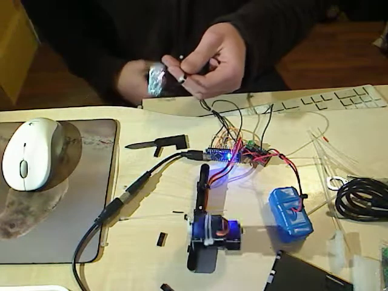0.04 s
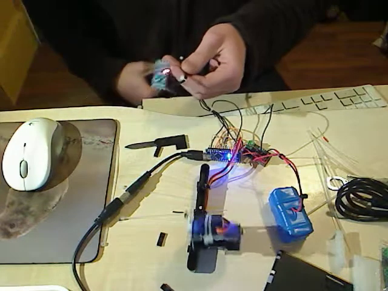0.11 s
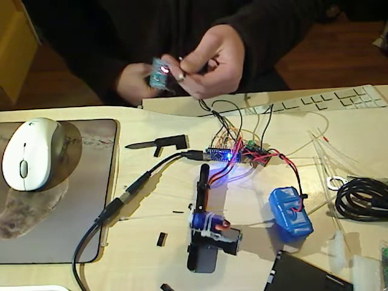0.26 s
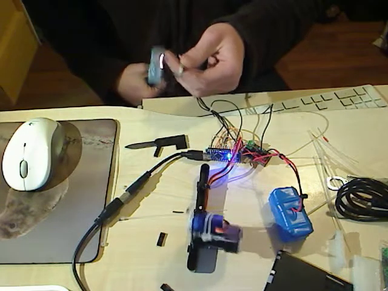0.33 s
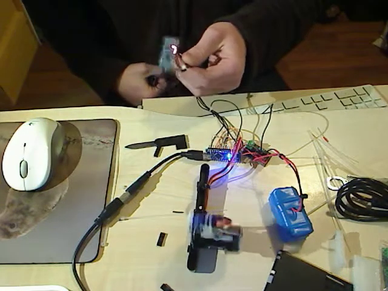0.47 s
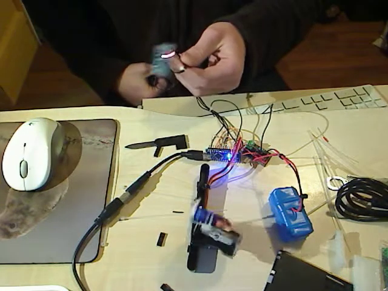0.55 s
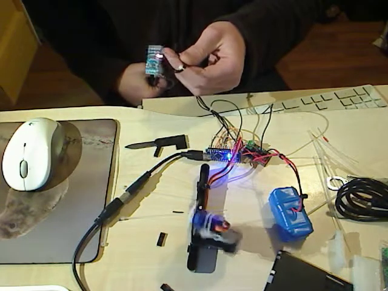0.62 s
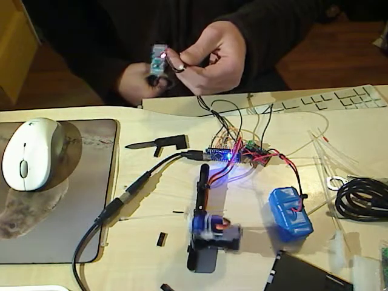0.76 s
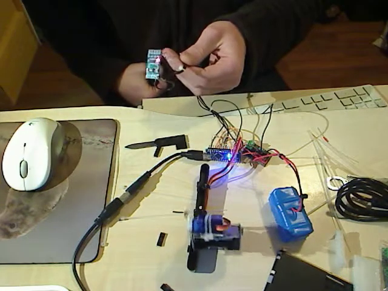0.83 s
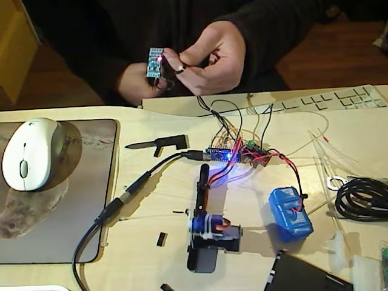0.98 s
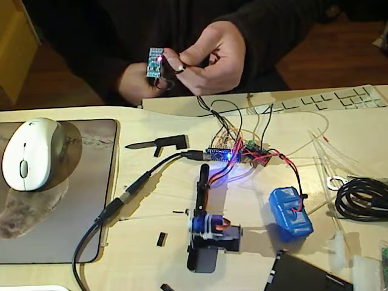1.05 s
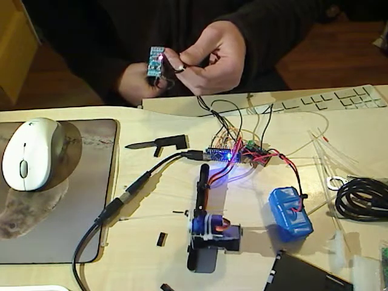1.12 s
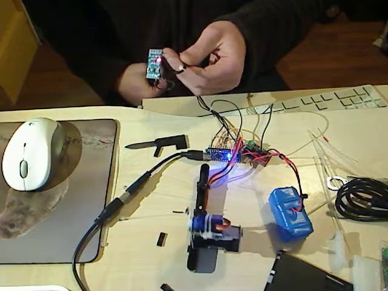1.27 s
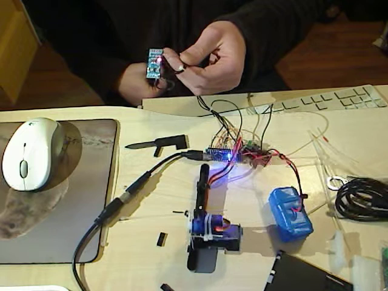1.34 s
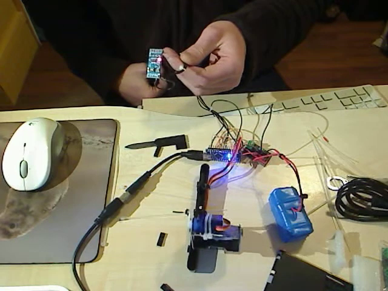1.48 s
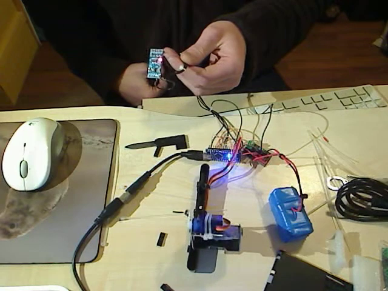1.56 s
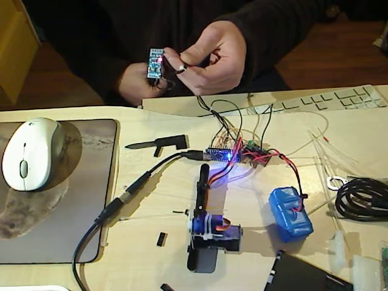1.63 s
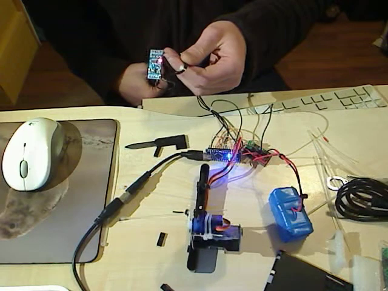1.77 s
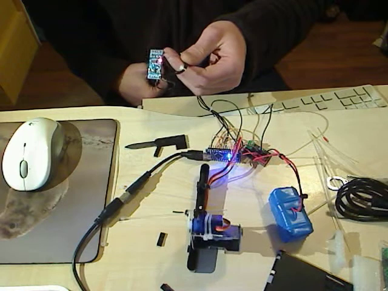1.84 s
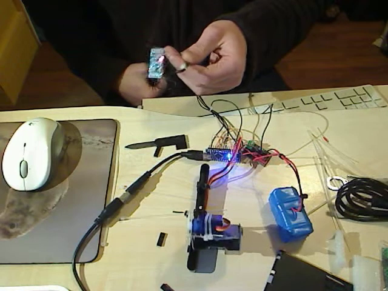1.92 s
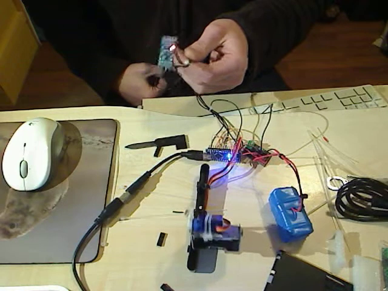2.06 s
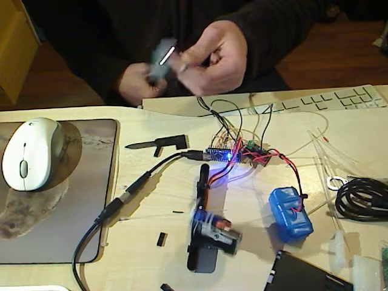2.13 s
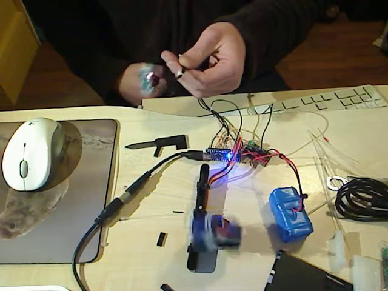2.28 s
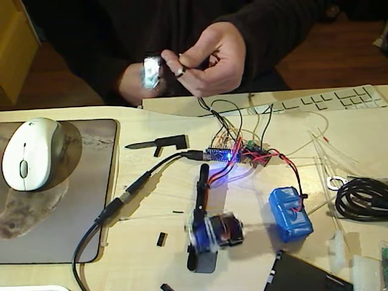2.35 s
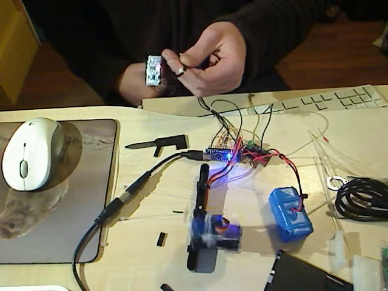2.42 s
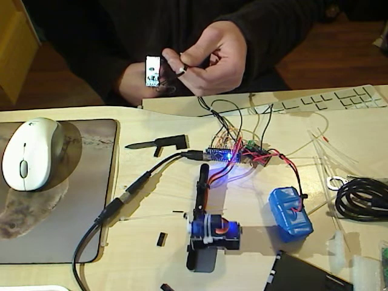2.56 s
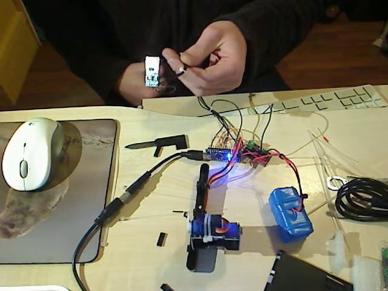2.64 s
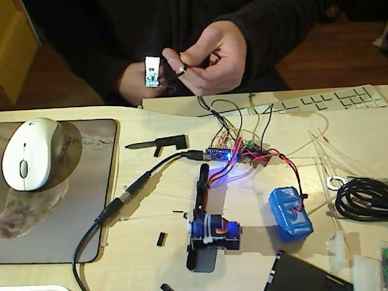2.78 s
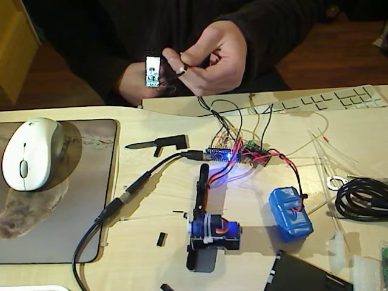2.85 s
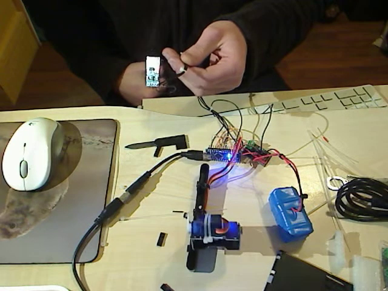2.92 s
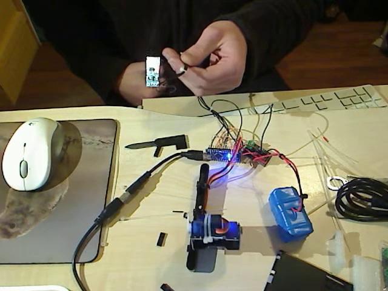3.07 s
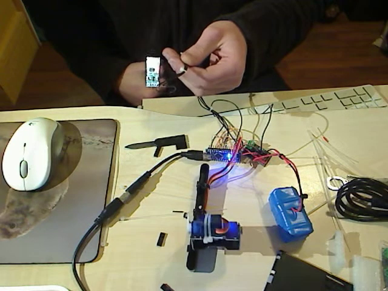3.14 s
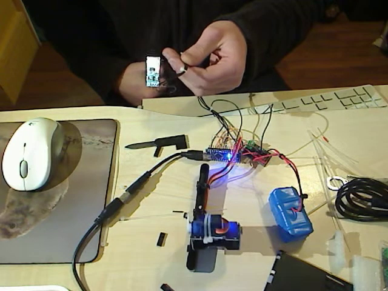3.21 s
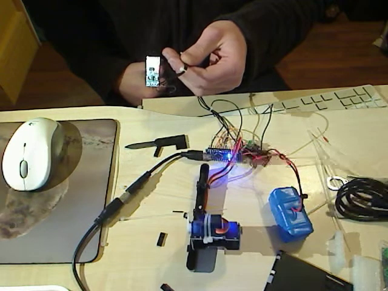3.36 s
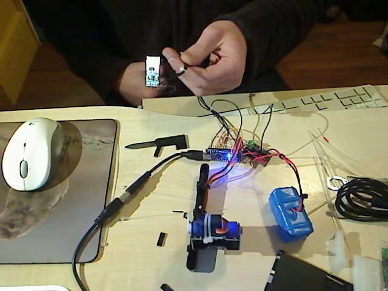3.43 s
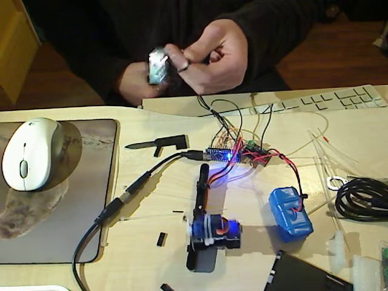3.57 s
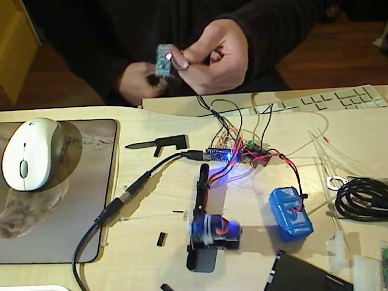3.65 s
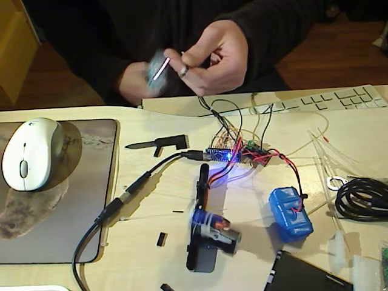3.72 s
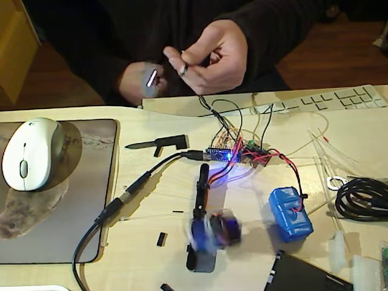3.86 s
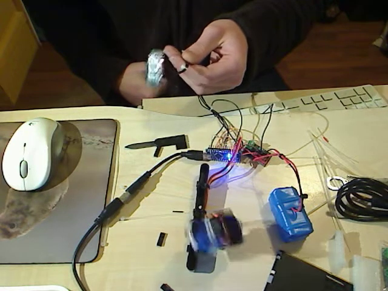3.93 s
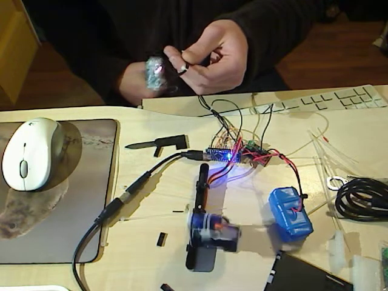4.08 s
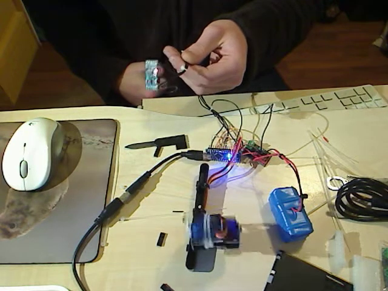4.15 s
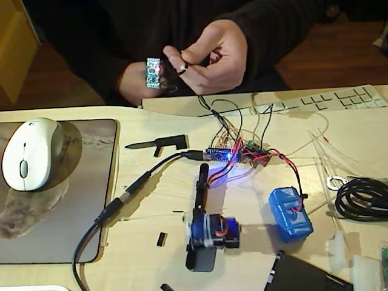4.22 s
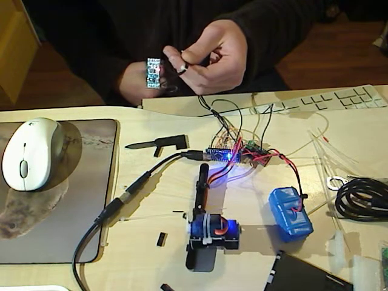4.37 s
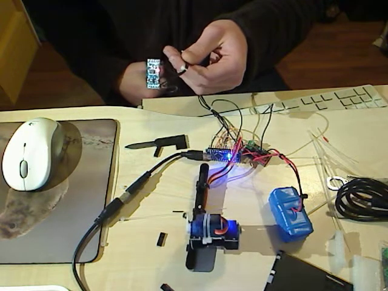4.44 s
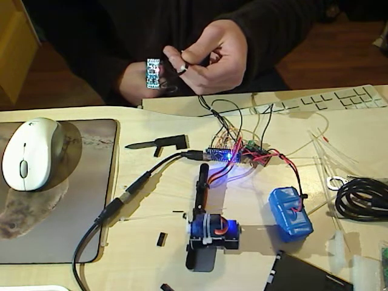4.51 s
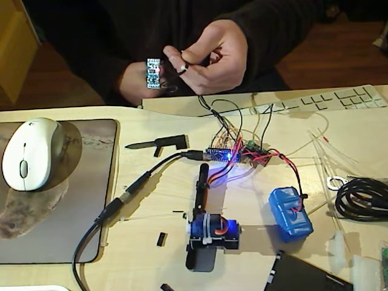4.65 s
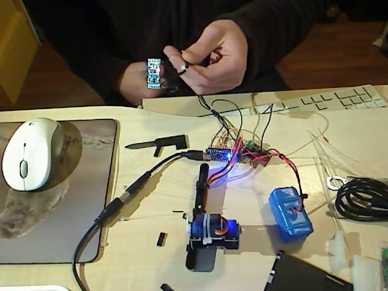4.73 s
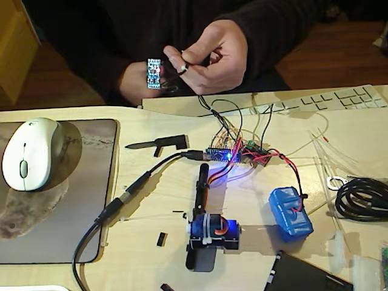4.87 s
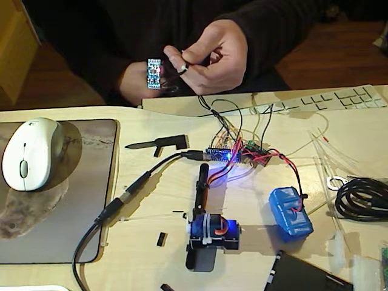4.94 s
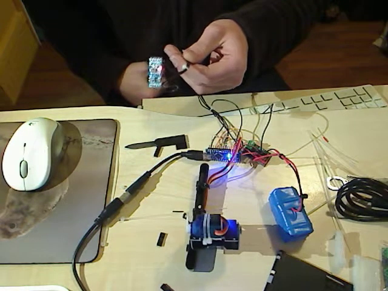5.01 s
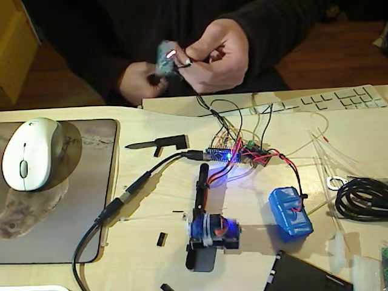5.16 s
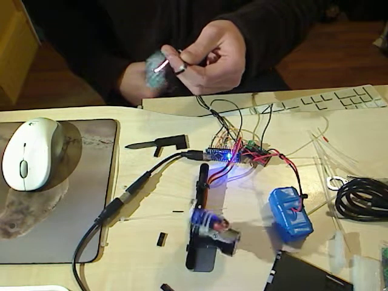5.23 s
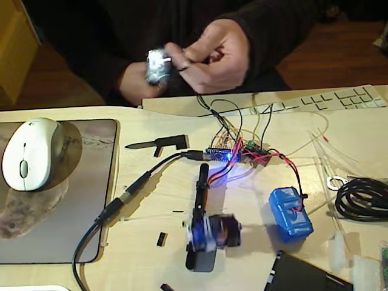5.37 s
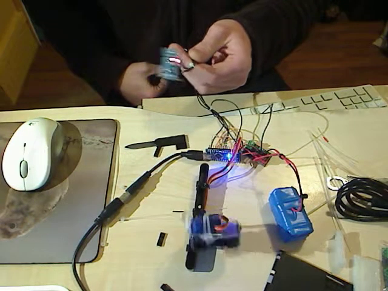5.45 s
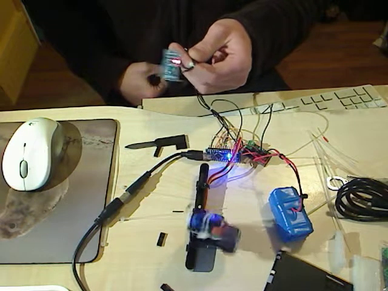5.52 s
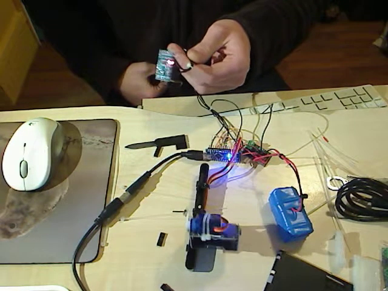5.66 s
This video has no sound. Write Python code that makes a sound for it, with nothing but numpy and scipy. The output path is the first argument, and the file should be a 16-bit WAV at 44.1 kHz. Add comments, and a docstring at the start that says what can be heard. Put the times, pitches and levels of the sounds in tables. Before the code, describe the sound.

Dry, raspy servo whirring starts at once in short overlapping strokes, eases into weak fluttering ticks, then returns in three brisk groups with gliding whines, gear snaps and woody plastic knocks on the desk. The last group has the sharpest clicks. Quiet steady room noise and hum continue throughout; short indoor reflections, modest microphone with no extreme treble.

```python
"""On a desk in a room, two small hobby servos swing a plastic mount, following a sensor tilted by hand.
In a move, random tooth impacts and mesh tones drive the resonant gear cases; fast strokes add a gliding
whine, slack teeth snap shut and the mount's damped modes knock on the desk. At rest the servos hunt,
with clusters of tooth impacts ticking at the 50 Hz control rate. Sine tones of mains and fan and
filtered room noise lie underneath; a diffuse tail gives the reflections."""
import sys
import numpy as np
from scipy import signal
from scipy.fft import rfft, irfft, next_fast_len
from scipy.io import wavfile
from scipy.ndimage import uniform_filter1d

SR = 44100
rng = np.random.default_rng(int(sys.argv[2]) if len(sys.argv) > 2 else 0)


def master(y):
    """Save y as 16-bit WAV."""
    cut = np.clip(np.atleast_2d(y).T, -1, 1)
    pcm = np.round(cut * 32767)  # scale
    wavfile.write(sys.argv[1], SR, pcm.astype(np.int16))


N = 250912
T = np.arange(N) / SR
FRAME_HZ, FRAME_START_S = 50, .0142  # servo control pulses
BASE_TEETH_PER_S, TOOTH_SCATTER_DB = 6500, 0.25


def undb(db):
    """Decibels to gain."""
    return 10 ** (np.asarray(db) / 20)


def unit(x):
    """Scale to rms 1."""
    return x / np.sqrt(np.mean(x ** 2))


def walk(rate_hz):
    """Smooth random wander of rms 1: held random steps, averaged twice."""
    k = int(SR / rate_hz)
    steps = np.repeat(rng.standard_normal(N // k + 1), k)
    return unit(uniform_filter1d(uniform_filter1d(steps, k), k)[:N])


def body(points, modes=(), size=8192):
    """Minimum-phase impulse response of unit energy from a broad spectrum and sharp resonances."""
    hz = np.maximum(np.arange(size // 2 + 1) * SR / size, 1)
    knots_hz, knots_db = np.transpose(points)
    db = np.interp(np.log(hz), np.log(knots_hz), knots_db)
    for centre_hz, width_hz, boost_db in modes:
        db = db + boost_db / (1 + (2 * (hz - centre_hz) / width_hz) ** 2)
    # folding the cepstrum makes the response causal
    cepstrum = irfft(np.log(undb(db)))
    cepstrum[1:size // 2] *= 2
    cepstrum[size // 2 + 1:] = 0
    response = irfft(np.exp(rfft(cepstrum)))
    return response / np.linalg.norm(response)


def ring(force, response):
    """Pass a force through a body."""
    return signal.fftconvolve(force, response)[:N]


def add(out, s, sound, peak_db):
    """Mix in a sound at time s with the given peak level."""
    i = max(int(s * SR), 0)
    out[i:i + len(sound)] += (undb(peak_db) * sound / np.abs(sound).max())[:N - i]


# Steady mains and fan tones. Each row: frequency in Hz, rms level in dB before the waver.
HUM_TONES = [(49.6, -67.5), (99.8, -64), (393, -77), (1147, -78)]
# Room and fan noise spectrum. Each row: frequency in Hz, relative level in dB.
ROOM_SPECTRUM = [(15, -18.5), (30, 2), (45, -3.5), (68, -11), (88, -3.5), (105, -7.5), (200, -11),
                 (500, -18), (850, -18.5), (1160, -20.5), (1260, -25), (2500, -27), (6000, -28.5),
                 (8000, -37.5), (9000, -61.5)]


def background(room_rms_db=-59, waver_db=2, drift_rad=0.48):
    """Mains and fan tones waver in level and phase over soft filtered room noise."""
    tones = np.zeros(N)
    for hz, rms_db in HUM_TONES:
        level = undb(rms_db + waver_db * walk(6))
        phase = 2 * np.pi * hz * T + drift_rad * walk(6.9)
        tones += level * np.sqrt(2) * np.sin(phase)
    noise = ring(rng.standard_normal(N), body(ROOM_SPECTRUM))
    return tones + undb(room_rms_db) * unit(noise)


def reflections(x, wet_db=-15, t60_s=0.35, size=12000):
    """Desk and nearby walls return a short, diffuse tail after 3 ms."""
    t = T[:size]
    tail = rng.standard_normal(size) * np.exp(-np.log(1000) * t / t60_s) * (t > .003)
    return undb(wet_db) * ring(x, tail / np.linalg.norm(tail))


# Modes of the mount on the desk. Each row: frequency in Hz, relative level in dB, t60 in s.
MOUNT_MODES = [(122.8, -8, 0.13), (268.5, -8, 0.13), (412, -27, 0.24), (472, -5.5, 0.053),
               (612, -4.5, 0.077), (678, -12.5, 0.096), (750, -2.5, 0.094), (833, 3.5, 0.014),
               (990, -4, 0.035), (1130, -4, 0.018)]


def mount_response(centre_hz=650, focus_db_per_octave=0, size=6000):
    """Damped modes of mount and desk after one blow; the point of contact favours modes near a centre."""
    t, response = T[:size], 0
    for k, (hz, db, t60_s) in enumerate(MOUNT_MODES):
        octaves_off = min(abs(np.log2(hz / centre_hz)), .5)
        gain = (-1) ** k * undb(db - focus_db_per_octave * octaves_off)
        decay = np.exp(-np.log(1000) * t / t60_s)
        response = response + gain * decay * np.sin(2 * np.pi * hz * t)
    return response / np.linalg.norm(response)


# Mount on desk. Each row: start in seconds, peak level in dB before gain_db, favoured centre in Hz.
KNOCK_EVENTS = [(0.28, -46, 730), (0.593, -39, 800), (0.699, -40.5, 592), (0.832, -42, 850),
                (2.307, -45.5, 810), (2.343, -42, 615), (2.404, -40, 740), (2.439, -42, 743),
                (2.552, -36.5, 487), (3.828, -35, 595), (3.866, -43, 740), (4.011, -40.5, 755),
                (4.153, -36, 748), (4.157, -28, 747), (4.264, -41, 764), (5.468, -43.5, 760),
                (5.588, -35.5, 660)]
# Dull crack of plastic on the desk. Each row: frequency in Hz, relative level in dB.
CONTACT_SPECTRUM = [(200, -9), (600, -0.5), (1300, -6.5), (2200, -12), (8000, -35.5)]


def knocks(gain_db=-2, focus_db_per_octave=9, crack_db=-6, chatter=0.053, chatter_s=0.0069, size=1000):
    """The mount rocks onto the desk: an impulse and brief noisy chatter excite its modes and a crack."""
    out, crack = np.zeros(N), undb(crack_db) * body(CONTACT_SPECTRUM)
    for s, peak_db, centre_hz in KNOCK_EVENTS:
        force = chatter * rng.standard_normal(size) * np.exp(-T[:size] / chatter_s)
        force[0] += 1
        modes = mount_response(centre_hz, focus_db_per_octave)
        knock = signal.fftconvolve(force, modes + crack[:len(modes)])
        add(out, s, knock, peak_db + gain_db)
    return out


# Gear backlash snapping shut. Each row: start in seconds, peak level in dB.
SNAP_EVENTS = [(2.455, -40), (2.502, -36.5), (3.983, -31), (4.264, -32), (4.277, -32.5), (5.516, -22.5),
               (5.570, -23.5), (5.579, -30), (5.586, -34.5)]
# Case colour in a snap. Each row: frequency in Hz, relative level in dB.
SNAP_SPECTRUM = [(500, -29), (1300, -10.5), (1750, 6.5), (2500, -6.5), (3500, 13.5), (5000, -2.5),
                 (8500, -31)]


def snaps(contact_s=0.00036, grit=0.36, size=300):
    """Slack in the gears closes with a hard click: a gritty impulse into the case."""
    out = np.zeros(N)
    case = body(SNAP_SPECTRUM, [(1850, 200, 5.3)])
    for s, peak_db in SNAP_EVENTS:
        force = grit * rng.standard_normal(size) * np.exp(-T[:size] / contact_s)
        force[0] += 1
        add(out, s, signal.fftconvolve(force, case), peak_db)
    return out


def teeth(hits_per_s, scatter_db):
    """Irregular tooth impacts of uneven force and random sign."""
    hit = rng.random(N) < hits_per_s / SR
    force = undb(scatter_db * np.minimum(rng.exponential(size=N), 4))
    return unit(hit * force * rng.choice([-1, 1], N) / np.sqrt(hits_per_s))


def shifting(force, depth_db, rate_hz=55, count=12):
    """As the teeth engage, the force wanders between neighbouring treble bands."""
    size = next_fast_len(N, real=True)
    spectrum = rfft(force, size)
    hz = np.arange(size // 2 + 1) * SR / size
    centres_hz = np.linspace(2500, 8200, count)
    # overlapping triangular bands; the lowest keeps a steady level
    low, *bands = (irfft(spectrum * np.interp(hz, centres_hz, share), size)[:N] for share in np.eye(count))
    return unit(low + sum(band * undb(depth_db * walk(rate_hz)) for band in bands))


# Servos hunting for position, kicking at the control rate. Each row: start in seconds, length in seconds,
# first and last kick force in dB before gain_db and scatter.
HUNT_EVENTS = [(0.215, .02, -37.5, -38), (0.255, .04, -44, -34), (0.452, .02, -32.5, -36),
               (1.133, .14, -46, -41), (1.318, .02, -35, -33.5), (1.399, .02, -36.5, -35),
               (1.614, .12, -42, -41), (1.772, .1, -38, -42.5), (1.89, .08, -37.5, -44.5),
               (1.992, .06, -39, -44), (2.074, .04, -39, -37), (2.153, .04, -36.5, -48),
               (2.195, .02, -30.5, -30), (2.238, .02, -29, -27), (2.735, .06, -40, -32),
               (2.853, .08, -39.5, -38), (2.954, .08, -41, -41.5), (3.052, .02, -44.5, -43),
               (3.294, .12, -44, -40), (3.454, .02, -42.5, -42.5), (3.536, .08, -42, -43.5),
               (3.633, .02, -38.5, -36), (3.694, .06, -41.5, -37), (3.8, .02, -33, -31),
               (4.456, .14, -39, -46), (4.633, .06, -38, -41), (4.756, .02, -46.5, -46),
               (4.816, .02, -43.5, -39.5), (4.856, .08, -45, -40), (5.096, .14, -41, -37.5),
               (5.28, .02, -33, -35)]
# Case colour in a kick. Each row: frequency in Hz, relative level in dB.
KICK_SPECTRUM = [(800, -20), (2200, -19), (3000, -8.5), (3750, -1), (4200, -6.5), (4600, -2), (5500, -4),
                 (5950, -17), (6400, -10), (7600, -11.5), (8600, -32)]


def kicks(gain_db=-8.5, scatter_db=1.3, rise_s=0.0011, coast_db=-15, coast_s=0.01, colour_db=2, size=1500):
    """In a hunt each control pulse jerks the motor: a tight cluster of tooth impacts, then a short coast."""
    push, t = np.zeros(N), T[:size]
    jerk = t / rise_s * np.exp(1 - t / rise_s) + undb(coast_db) * np.exp(-t / coast_s)
    for s, length_s, first_db, last_db in HUNT_EVENTS:
        pulses = max(round(length_s * FRAME_HZ), 1)
        for k, db in enumerate(np.linspace(first_db, last_db, pulses)):
            kick_db = db + gain_db + scatter_db * rng.standard_normal()
            add(push, s + k / FRAME_HZ, jerk, kick_db)
    impacts = shifting(teeth(2 * BASE_TEETH_PER_S, TOOTH_SCATTER_DB), colour_db)
    return ring(push * impacts, body(KICK_SPECTRUM, [(3540, 2600, 9.6)]))


# Fast strokes. Each row: middle in seconds, length in seconds, mid-stroke tooth mesh in Hz before backlash,
# glide in Hz per s, mid-stroke whine peak in dB before gain_db and roughness.
STROKE_EVENTS = [(0.739, 0.073, 3550, 6003, -40), (2.428, 0.037, 3474, -12000, -27.5),
                 (2.523, .055, 3860, 7001, -36), (3.999, 0.049, 3595, 999, -28.5),
                 (4.022, 0.032, 3420, -7000, -25.5), (4.266, 0.051, 3245, -4000, -36),
                 (5.332, .035, 4023, 29999, -38.5), (5.425, .05, 3392, -7500, -44.5),
                 (5.478, .055, 2930, -12000, -38.5), (5.581, 0.03, 4290, 37998, -34)]


def whine(gain_db=-2, rough_db=2.0, edge_drop_db=12, edge_sag=.05):
    """The first gear's mesh tone swells and sags with each stroke; backlash smears a weak mesh more."""
    out = np.zeros(N)
    stray, strength = walk(900), undb(rough_db * walk(300))
    for s, length_s, hz, glide_hz_per_s, db in STROKE_EVENTS:
        near = np.abs(T - s) < length_s
        t = T[near] - s
        edge = (2 * t / length_s) ** 2  # 1 at both ends of the stroke
        level_db = db - edge_drop_db * edge
        backlash = np.interp(level_db, [-42, -30], [.06, .025])
        pitch_hz = (hz + glide_hz_per_s * t) * (1 - edge_sag * edge) * (1 + backlash * stray[near])
        out[near] += undb(level_db + gain_db) * np.sin(2 * np.pi * np.cumsum(pitch_hz) / SR)
    return out * strength


def mesh_tone(speed, hz, wander=.13, sag=0.182, backlash=.035):
    """One motor's tooth tone: each control pulse speeds it up, then it sags until the next."""
    frame = FRAME_HZ * (T - FRAME_START_S) % 1
    unsteady = 1 + wander * walk(22) - sag * (frame - .5) + backlash * walk(900)
    pitch_hz = hz * (.8 + .3 * speed) * unsteady
    return np.sqrt(2) * np.sin(2 * np.pi * np.cumsum(pitch_hz) / SR)


def plateau(start_s, hold_s, db, rise_db_per_s, fall_db_per_s):
    """A level in dB that climbs, holds and falls away."""
    early_s = np.maximum(start_s - T, 0)
    late_s = np.maximum(T - start_s - hold_s, 0)
    return db - rise_db_per_s * early_s - fall_db_per_s * late_s


# Servos chasing the hand. Each row: up to speed at seconds, held for seconds, gear effort in dB
# before the ceiling, lower case ring in dB at full speed.
SURGE_EVENTS = [(0.013, 0.081, -39.5, 1.5), (0.134, 0.036, -46.5, -10), (0.31, 0.074, -42.5, -6.5),
                (0.464, 0.031, -43.0, -1.5), (0.517, 0.313, -40, -1), (0.87, 0.041, -39.5, -6),
                (0.985, 0.035, -39, -1.0), (1.061, 0.022, -45, -11), (1.121, 0.029, -49.5, -0.5),
                (1.233, 0.03, -50.5, -2), (1.322, 0.045, -49.5, -3), (1.403, 0.065, -47, 4),
                (1.516, 0.1, -53.5, 0), (2.104, 0.047, -48, -0.5), (2.234, 0.074, -40.5, -3),
                (2.386, 0.069, -35, 0.5), (2.512, 0.044, -38.5, -2.5), (2.622, 0.043, -42.5, -2),
                (2.753, 0.018, -50.5, 0.5), (3.743, 0.017, -45, -7), (3.824, 0.066, -39.0, -2),
                (3.971, 0.07, -34.5, 0), (4.082, 0.087, -38.0, 0.5), (4.237, 0.046, -36.5, 2.5),
                (4.345, 0.041, -42.5, -6.5), (4.452, 0.132, -54.0, 1.0), (4.657, 0.039, -52, 3),
                (5.213, 0.024, -50.5, 1.5), (5.309, 0.062, -40.0, -1), (5.443, 0.144, -37, 2.5),
                (5.617, 0.08, -38.5, -1.5)]


def effort(spin_up_db_per_s=199.5, spin_down_db_per_s=212.5,
           creep_db=-18.5, creep_rise_db_per_s=1499, creep_fall_db_per_s=258.5):
    """Level of the gear train in dB: the strongest surge, or creep while hunting, under way."""
    level_db = np.full(N, -100.)
    for s, hold_s, db, _ in SURGE_EVENTS:
        surge = plateau(s, hold_s, db, spin_up_db_per_s, spin_down_db_per_s)
        level_db = np.maximum(level_db, surge)
    for s, length_s, first_db, last_db in HUNT_EVENTS:
        db = (first_db + last_db) / 2 + creep_db
        creep = plateau(s, length_s - 1 / FRAME_HZ, db, creep_rise_db_per_s, creep_fall_db_per_s)
        level_db = np.maximum(level_db, creep)
    return level_db


# Case colour in a move. Each row: frequency in Hz, relative level in dB.
CASE_SPECTRUM = [(150, -21.5), (1400, -20), (1800, -18), (2400, -12.5), (3000, -6.5), (3450, -1.5),
                 (4150, -7), (4550, -2), (5450, 1), (5950, -12.5), (6350, -5), (7700, -7.5), (8350, -15),
                 (9000, -39)]
# Sharp case resonances. Each row: frequency in Hz, width in Hz, boost in dB.
CASE_RESONANCES = [(2903, 33, 6), (3180, 14, 0.5), (3460, 12, 1), (3570, 8.9, -1.5), (3840, 31, 7.5),
                   (4390, 27, 6.5), (4250, 70, 1), (4604, 35, 6.5), (4580, 22, 5), (5210, 41, -5),
                   (5150, 26, 0), (5210, 46, 6), (5256, 29, 7.5), (5610, 29, 13), (6140, 140, 8.5),
                   (6655, 32, 10.5)]


def gears(move_db=-0.12, creep_db=-0.4, mesh_db=-17, flutter_db=1.06, throb_db=2.15, colour_db=2,
          half_speed_db=-44, blend_db=2.0, rumble_db=-15.5, sway_db=1.7, coupling_hz=1300,
          ceiling_db=-37.0, split_hz=4150):
    """Teeth rattle the cases: dense when fast, sparse and throbbing at the control rate when slow."""
    level_db = effort()
    speed = 1 / (1 + np.exp((half_speed_db - level_db) / blend_db))  # 0 creeping, 1 full speed

    impacts = teeth(BASE_TEETH_PER_S * (.3 + speed), TOOTH_SCATTER_DB)
    mesh = mesh_tone(speed, hz=3990) + 0.68 * mesh_tone(speed, hz=5735)
    force = shifting(impacts, colour_db) + undb(mesh_db) * mesh
    throb = np.cos(2 * np.pi * FRAME_HZ * (T - FRAME_START_S - .004))
    force = force * undb(flutter_db * walk(170) + throb_db * (1 - 0.88 * speed) * throb)

    fast = undb(move_db) * speed * unit(ring(force, body(CASE_SPECTRUM, CASE_RESONANCES)))
    slow = undb(creep_db) * (1 - speed) * unit(ring(force, body(KICK_SPECTRUM, CASE_RESONANCES)))
    case = fast + slow

    # the load in each surge shifts the balance between the lower and upper case resonances
    lower = signal.sosfiltfilt(signal.butter(6, split_hz, fs=SR, output="sos"), case)
    start_s, hold_s, _, ring_db = np.transpose(SURGE_EVENTS)
    load_db = speed * np.interp(T, start_s + hold_s / 2, ring_db)
    rattle = undb(load_db) * lower + undb(-.3 * load_db) * (case - lower)

    # only a moving train shakes the mount, through a soft plastic joint
    shake = undb(rumble_db + sway_db * walk(23)) * speed
    joint = signal.butter(3, coupling_hz, fs=SR, output="sos")
    rumble = signal.sosfilt(joint, ring(force, mount_response()))

    # the gear level is capped at ceiling_db, so the loudest surges rattle about equally loud
    return undb(np.minimum(level_db, ceiling_db)) * (rattle + shake * unit(rumble))


def scene():
    """The servos with their reflections, over the room and the hum."""
    servos = gears() + whine() + kicks() + knocks() + snaps()
    return (servos + reflections(servos) + background())[None]


def record(dry, top_hz=8750, offset=-.0127):
    """A narrow-band microphone input: a steep low-pass and a small constant offset."""
    return signal.sosfilt(signal.ellip(8, .2, 70, top_hz, fs=SR, output="sos"), dry) + offset


dry = scene()
out = record(dry)
master(out)
```